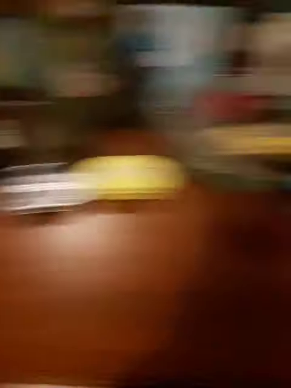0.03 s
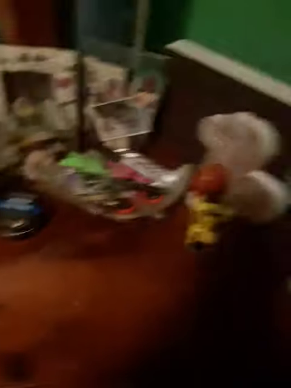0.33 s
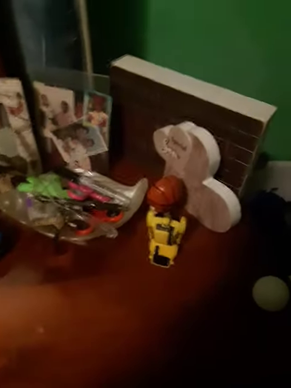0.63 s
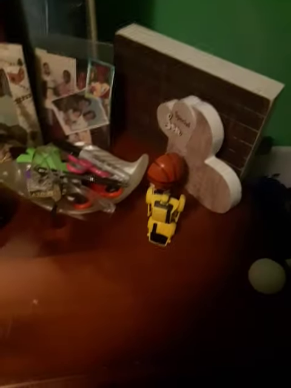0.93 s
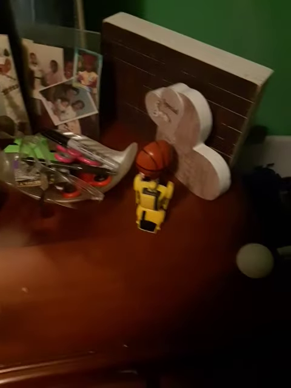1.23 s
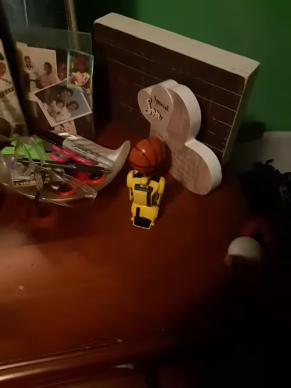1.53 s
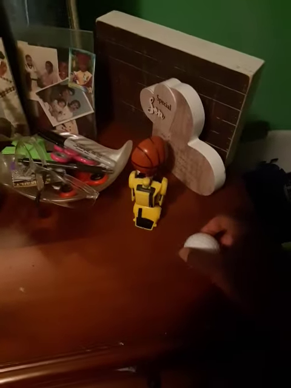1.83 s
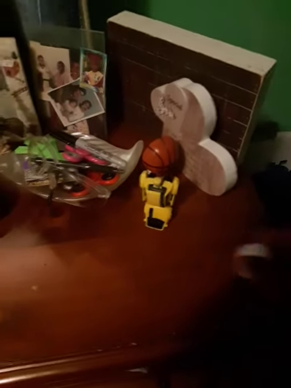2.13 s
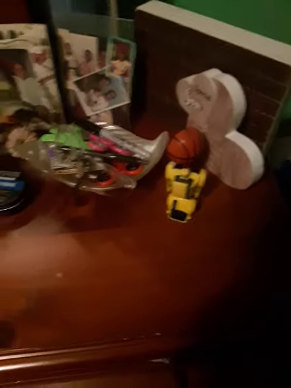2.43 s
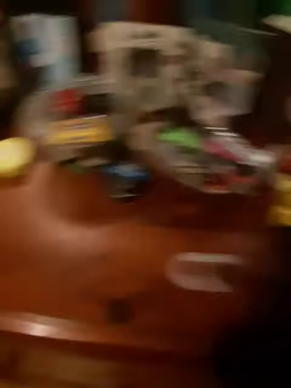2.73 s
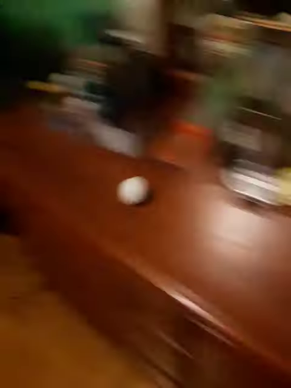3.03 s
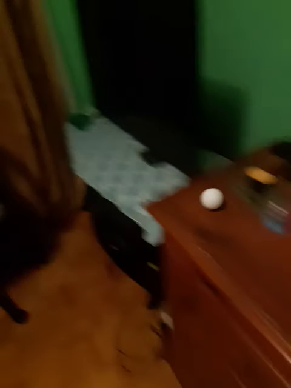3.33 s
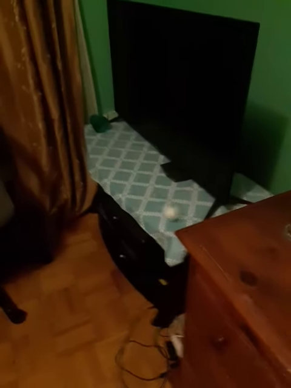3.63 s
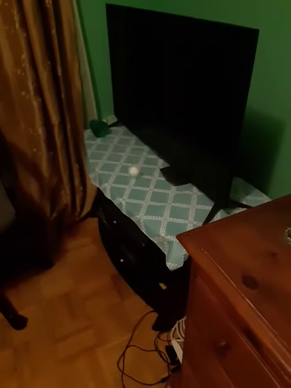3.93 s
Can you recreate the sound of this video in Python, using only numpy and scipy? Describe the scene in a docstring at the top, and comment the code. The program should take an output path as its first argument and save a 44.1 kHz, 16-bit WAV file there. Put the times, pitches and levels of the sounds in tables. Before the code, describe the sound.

A table-tennis ball bounces on a wooden dresser in a small, quiet room. At first there is only low rumble, a faint wavering hum and slight handling swishes, with a light finger tap at 1.5 seconds. From 2.8 to 3.4 seconds come about twelve sharp, hollow clicks, quickening and fading, slightly left, over low microphone bumps. From 3.7 to 4 seconds the ball knocks softly three times on a cloth-covered stand.

```python
"""Table-tennis ball on a dresser

A ball tossed on to a wooden dresser in a small, quiet bedroom bounces ever faster. Each impact excites
the modes of the top and of the hollow shell; the ball then drops off the end and knocks softly on a
cloth-covered stand. Before that come faint swishes and the tick of fingers picking up the ball.
Handling bumps, room rumble and a wavering low drone lie underneath."""
import sys
import numpy as np
from scipy import signal
from scipy.fft import rfft, irfft, next_fast_len
from scipy.io import wavfile
from scipy.ndimage import uniform_filter1d, map_coordinates

SR = 44100
rng = np.random.default_rng(int(sys.argv[2]) if len(sys.argv) > 2 else 0)


def unload_wav(signal):
    """Save mono or channel-first audio to the path in sys.argv[1] as 16-bit WAV at rate SR, clipped to [-1, 1]."""
    wavfile.write(
        sys.argv[1],
        SR,
        np.round(np.clip(np.atleast_2d(signal).T, -1, 1) * 32767).astype(np.int16),
    )


N = 176400
TIME = np.arange(N) / SR
AGE = np.arange(SR // 2) / SR  # time since a contact [s]

# left-right coherence of rumble and swishes: (frequency [Hz], correlation [-1..1])
NOISE_COHERENCE = [(30, 0.099), (60, 0.24), (130, 1), (300, 0.46), (1000, 0.091), (4000, 0.033),
                   (15000, .05)]


def dresser():
    """Modal excitation: each impact rings top and shell, and the spot struck sets which modes dominate."""
    # (time [s], contact time [s], knock [dB], centre of the favoured modes [Hz], their level [dB],
    #  thud [dB], crack [dB], click [dB], lower shell ring [dB], upper shell ring [dB])
    bounces = [(2.7924, 0.00075, -26, 1140, -30.5, -30.5, -36.5, -34, -37.5, -32.5),
               (2.897, 0.00056, -20.5, 1510, -26.5, -35.5, -22.5, -38, -24.5, -31),
               (2.9917, 0.00071, -24.5, 684, -22, -32.5, -30, -34.5, -36, -33.5),
               (3.0654, 0.00071, -27.5, 570, -27, -38.5, -39, -36, -43.5, -39.5),
               (3.1316, 0.000582, -24, 640, -28, -56, -33, -43.5, -41.5, -44),
               (3.1698, 0.00081, -30.5, 646, -31, -62, -45, -43, -44, -49),
               (3.2073, 0.00063, -28.5, 1530, -30.5, -70, -36, -47, -40, -43),
               (3.2435, 0.00071, -30, 905, -30.5, -61, -43, -42, -43, -41),
               (3.2919, 0.000831, -29, 680, -33.5, -57, -38.5, -39.5, -52, -41.5),
               (3.346, .000876, -30.5, 950, -31.5, -49.5, -41.5, -43, -47.5, -48.5),
               (3.392, 0.00077, -29.5, 1038, -30, -58.5, -42.5, -49, -53, -49),
               (3.4351, .00071, -35.5, 1030, -40, -53, -55, -55.5, -52.5, -58)]
    # spectra of wooden top, hard hit on varnish and contact click: (frequency [Hz], level [dB])
    wood_spectrum = [(60, -29), (120, -15), (200, -9.5), (360, -11), (470, -4), (660, -0.5), (800, -0.5),
                     (1100, -0.5), (1500, -4), (2100, -20), (2700, -18.5), (4400, -37.5), (16000, -70.5)]
    crack_spectrum = [(200, -33), (1000, -9), (1450, 3.5), (1750, 0.5), (2200, 0), (2650, -8.5), (3100, -8),
                      (3800, -10), (4500, -19.5), (9000, -41.5)]
    click_spectrum = [(60, -38.5), (300, -25), (2000, 6.5), (3400, 0.5), (4400, -1), (5400, 4), (8300, 5.5),
                      (10000, 2), (13000, -2), (16000, -5)]
    # the top's middle and lowest modes, the shell's two families: (frequency [Hz], level [dB], t60 [s])
    top_modes = [(449, -11.5, 0.038), (557.6, 0.5, 0.038), (612.5, 3.5, 0.036), (681, -2, 0.051),
                 (790, -7, 0.022), (888, -4.5, 0.049), (1122.5, -1, 0.05), (1347, -1, 0.034),
                 (1460, -2, 0.0076), (1566, -4, 0.03), (1767, 5, 0.02), (1995, -6, 0.029)]
    thud_modes = [(269.4, -2, 0.06), (313, -4, 0.034)]
    lower_modes = [(5294, -3.5, 0.0078), (5523, 5, 0.009), (5640, -4.5, .02), (6000, -1.5, 0.011),
                   (8880, -24, .008)]
    upper_modes = [(6060, 3.5, 0.0099), (6434, 5.5, 0.0091), (6610, -7, .028), (7000, 2.5, 0.0067),
                   (7780, -3.5, .007), (8245, 0, .008), (10480, -10.5, .01)]
    favour_octaves, board_rise_s = 0.2, 0.00091
    out = np.zeros((2, N))
    for s, contact_s, knock_db, board_hz, board_db, thud_db, crack_db, click_db, *shell_db in bounces:
        lower_db, upper_db = shell_db
        favoured = [(hz, db - (np.log2(hz / board_hz) / favour_octaves) ** 2, t60)
                    for hz, db, t60 in top_modes]
        knock = amp(knock_db) * burst(wood_spectrum, t60=0.023, rise_s=0.0014)
        board = amp(board_db) * ring(favoured, board_rise_s)
        thud = amp(thud_db) * ring(thud_modes, board_rise_s)
        click = amp(click_db) * burst(click_spectrum, t60=0.0022)
        shell = amp(lower_db) * ring(lower_modes) + amp(upper_db) * ring(upper_modes)
        crack = amp(crack_db) * burst(crack_spectrum, t60=0.0074)
        contact = touch_and_release(crack + click + shell, contact_s)
        add(out, s, in_room(knock + board + thud + contact, wet_db=0.5))
    return out


def touch_and_release(x, contact_s, release_db=-1.1):
    """Comb filtering: the shell clicks as it dents and as it springs back, giving a hollow pitch."""
    return filtered(x, lambda hz: 1 + amp(release_db) * np.exp(-2j * np.pi * hz * contact_s)) / np.sqrt(2)


def stand():
    """Cushioned impact: cloth dulls each landing to a knock and a tick; the panel beneath then booms."""
    # (time [s], knock [dB], boom [dB], cloth tick [dB], gap between the tick's two clicks [s])
    landings = [(3.6695, -34.5, -28, -45, 0), (3.863, -29.5, -42, -47.5, 0), (3.983, -41, -40, -58, .00021)]
    # spectra of the stand's knock and the cloth's tick: (frequency [Hz], level [dB])
    knock_spectrum = [(30, -57), (60, -42.5), (100, -19.5), (200, -3.5), (300, 8), (400, 2.5), (600, 3),
                      (1000, -1.5), (1500, -10), (2200, -39.5), (3200, -79), (8000, -40.5)]
    cloth_spectrum = [(60, -37), (500, 12), (2300, 12), (3500, -4), (5400, 1.5), (7500, -12.5), (11000, -6),
                      (13000, -12), (16000, -5)]
    # resonances of the panel: (frequency [Hz], level [dB], t60 [s])
    panel_modes = [(135.3, -7.5, 0.23), (162.3, -6, 0.11), (183.6, -7, 0.095), (297, -10, 0.063)]
    boom_delay_s = 0.0128
    out = np.zeros((2, N))
    for s, knock_db, boom_db, tick_db, gap_s in landings:
        tick = amp(tick_db) * touch_and_release(burst(cloth_spectrum, t60=0.18), gap_s)
        knock = amp(knock_db) * burst(knock_spectrum, t60=0.18, rise_s=0.01)
        add(out, s, in_room(knock + tick, wet_db=-3))
        add(out, s + boom_delay_s, amp(boom_db) * ring(panel_modes, rise_s=0.0098))
    return out


def pick_up():
    """Impulse response of a held shell: fingers tap the ball twice and it rings briefly."""
    # finger contacts: (time [s], tap [dB], shell ring [dB])
    taps = [(1.5455, -56, -63.5), (1.5765, -73, -69)]
    # spectrum of a finger tap: (frequency [Hz], level [dB])
    finger_spectrum = [(60, -23), (250, -37), (450, 0.5), (600, 9), (1150, 9.5), (1500, -13), (2200, -10.5),
                       (4500, -24.5), (8000, -11.5), (15000, -38)]
    # modes of the held shell: (frequency [Hz], level [dB], t60 [s])
    held_modes = [(5660, 6, 0.02), (5520, -6, .012), (5900, -6, .01), (8140, -18, 0.011)]
    out = np.zeros((2, N))
    for s, tap_db, ring_db in taps:
        tap = amp(tap_db) * burst(finger_spectrum, t60=0.028)
        shell = amp(ring_db) * ring(held_modes)
        add(out, s, in_room(tap + shell, wet_db=9.5))
    return out


def handling():
    """Structure-borne noise: low bumps, a tick and faint swishes as the microphone is swung about."""
    # handling bumps: (time [s], level [dB])
    bumps = [(0.613, -47), (2.619, -52.5), (2.982, -37.5), (3.03, -38.5), (3.138, -44)]
    # spectra of a bump and of the tick: (frequency [Hz], level [dB])
    bump_spectrum = [(20, -21.5), (50, -2.5), (90, 4.5), (160, -25.5), (500, -29), (2000, -63)]
    tick_spectrum = [(1500, -24), (2700, -3), (5200, 4), (7000, -14), (15000, -31)]
    # swells of rubbing noise: (time [s], half length [s], level [dB], centre [Hz], width [octaves])
    swishes = [(0.023, 0.045, -62.5, 920, 1), (0.094, 0.036, -68, 3100, 0.44),
               (0.075, 0.052, -69.5, 5100, 0.23), (0.065, 0.044, -74, 11500, 0.37),
               (0.382, 0.017, -77, 2500, 0.94), (0.454, 0.022, -73.5, 570, 0.67),
               (0.56, 0.075, -81, 2600, 0.9), (0.57, 0.022, -71, 270, 0.78)]
    tick_s, tick_db = 0.0885, -59.5
    out = np.zeros((2, N))
    for s, db in bumps:
        bump = np.array([burst(bump_spectrum, t60=0.1, rise_s=0.008) for channel in range(2)])
        add(out, s, amp(db) * bump)
    add(out, tick_s, amp(tick_db) * burst(tick_spectrum, t60=0.012))
    rub = stereo_noise(N, NOISE_COHERENCE)
    for s, half_s, db, centre_hz, octaves in swishes:
        hiss = filtered(rub, lambda hz: np.exp(-0.5 * (np.log2((hz + 1) / centre_hz) / octaves) ** 2))
        swell = np.exp(-0.5 * ((TIME - s) / half_s * 1.25) ** 2)
        out += amp(db) * unit(hiss) * swell
    return out


def in_room(x, wet_db):
    """Reverberation: direct sound, early reflections and a short diffuse tail, new for each spot."""
    # reverberation time: (frequency [Hz], t60 [s])
    decay_times = [(120, 0.14), (300, 0.3), (1000, 0.23), (3000, 0.19), (6000, 0.2), (10000, 0.16),
                   (15000, 0.23)]
    # colour of the tail: (frequency [Hz], relative level [dB])
    tail_spectrum = [(100, -2.5), (300, -2.5), (700, -6), (1500, -4.5), (3000, -2.5), (6000, -4.5),
                     (15000, -6)]
    # left-right coherence of reflected sound: (frequency [Hz], correlation [-1..1])
    coherence = [(130, .92), (300, 0.94), (600, 0.31), (1200, -0.18), (5000, -0.27)]
    # reflections from nearby surfaces: (delay [s], level [dB])
    echoes = [(.0079, -17.5), (0.0233, -25.5)]
    onset_s, clutter_db, clutter_t60 = 0.0079, -2.5, 0.024
    hz, t, bands = signal.stft(stereo_noise(len(AGE), coherence), SR, nperseg=256)
    decay = amp(-60 * t / along(decay_times, hz)[:, None])
    tail = signal.istft(bands * decay, SR, nperseg=256)[1][:, :len(AGE)]
    tail *= 1 - np.exp(-(AGE / onset_s) ** 2)
    tail = filtered(whitened(tail), lambda f: amp(wet_db + along(tail_spectrum, f)))
    # objects on the dresser scatter the sound
    scatter = stereo_noise(len(AGE), coherence) * amp(-60 * AGE / clutter_t60)
    early = amp(clutter_db) * scatter / np.linalg.norm(scatter[0])
    early[:, 0] += 1  # direct path
    for delay_s, db in echoes:
        path_s = delay_s * np.exp(0.087 * rng.standard_normal())
        for side in early:
            arrival_s = abs(path_s + 0.0001 * rng.standard_normal())
            side[int(arrival_s * SR)] += amp(db)
    return signal.fftconvolve(x[None], whitened(early) + tail, axes=1)


def drone():
    """Amplitude and frequency modulation: a low tone swells, flutters and wavers in pitch."""
    # slow swell: (time [s], relative level [dB])
    swell = [(0, -63), (.13, -62.5), (.22, -55.5), (.35, -59.5), (.43, -87), (.58, -68), (.78, -59.5),
             (1.0, -52), (1.27, -61.5), (1.83, -60), (2.05, -75), (2.25, -62.5), (2.552, -64), (2.8, -63.5)]
    pitch_hz, waver_hz, gain_db, flutter_db = 134.7, 1.73, -5, 1.5
    level_db = np.interp(TIME, *np.transpose(swell)) + gain_db + flutter_db * wobble(per_s=19)
    hz = pitch_hz + waver_hz * wobble(per_s=21)
    return amp(level_db) * unit(np.sin(2 * np.pi * np.cumsum(hz) / SR))


def room_noise(level_db=-67):
    """Stationary broadband noise: the room's low rumble and faint hiss."""
    # noise floor: (frequency [Hz], relative spectral density [dB])
    spectrum = [(25, -23), (45, -15), (60, -2), (90, -11), (130, -9), (175, -10), (240, -11), (330, -21),
                (500, -25.5), (1000, -31.5), (3000, -36.5), (15800, -37.5)]
    noise = stereo_noise(N, NOISE_COHERENCE)
    return amp(level_db) * unit(filtered(noise, lambda hz: amp(along(spectrum, hz))))


def burst(spectrum, t60, rise_s=0.0001):
    """Modal overlap: a struck body's crowded modes merge into decaying noise of the body's colour."""
    shake = rng.standard_normal(len(AGE)) * amp(-60 * AGE / t60) * (1 - np.exp(-AGE / rise_s))
    gain = amp(along(spectrum, np.fft.rfftfreq(len(AGE), 1 / SR)))
    return unit_energy(coloured(whitened(shake), gain))


def ring(modes, rise_s=0.00053, scatter_db=1.85):
    """Free vibration: damped sines whose strengths and phases vary from contact to contact."""
    x = np.zeros(len(AGE))
    for hz, db, t60 in modes:
        envelope = amp(db + scatter_db * rng.standard_normal() - 60 * AGE / t60)
        x += envelope * np.sin(2 * np.pi * (hz * AGE + rng.random()))
    return unit_energy(x * (1 - np.exp(-AGE / rise_s)))


def stereo_noise(size, coherence):
    """Partial coherence: the balance of mid and side noise sets the left-right correlation."""
    def balance(hz):
        angle = np.arccos(np.clip(along(coherence, hz), -1, 1)) / 2
        return np.array([np.cos(angle), np.sin(angle)])
    mid, side = filtered(rng.standard_normal((2, size)), balance)
    return np.array([mid + side, mid - side])


def coloured(x, gain):
    """Minimum-phase filtering: folding the cepstrum makes a gain per frequency bin causal."""
    n = x.shape[-1]
    cepstrum = irfft(np.log(gain), n)
    cepstrum[1:n // 2] *= 2
    cepstrum[n // 2 + 1:] = 0
    return irfft(rfft(x) * np.exp(rfft(cepstrum)), n)


def whitened(x):
    """Whitening: the broad spectrum is flattened while its fine grain remains."""
    power = np.mean(np.abs(rfft(np.atleast_2d(x))) ** 2, axis=0)
    broad_power = np.abs(uniform_filter1d(power, size=160)) + 1e-12
    return coloured(x, broad_power ** -0.5)


def filtered(x, response):
    """Linear filtering: the spectrum of x times a response of frequency."""
    n = x.shape[-1]
    padded = next_fast_len(n + SR // 10)
    return irfft(rfft(x, padded) * response(np.fft.rfftfreq(padded, 1 / SR)), padded)[..., :n]


def amp(db):
    """Decibels to amplitude ratio."""
    return 10 ** (np.asarray(db) / 20)


def unit(x):
    """Normalisation to rms 1."""
    return x / np.sqrt(np.mean(x ** 2) + 1e-20)


def unit_energy(x):
    """Normalisation to the energy of 5 ms at rms 1."""
    return x / np.sqrt(np.sum(x ** 2) / (0.005 * SR) + 1e-20)


def along(points, hz):
    """Interpolation of (frequency [Hz], value) points on a logarithmic frequency axis."""
    knots_hz, values = np.transpose(points)
    return np.interp(np.log(hz + 1), np.log(knots_hz + 1), values)


def wobble(per_s):
    """Random modulation: a smooth curve through per_s random knots a second."""
    knots = rng.standard_normal(int(N * per_s / SR) + 4)
    return map_coordinates(knots, [TIME * per_s])


def add(track, s, x):
    """Superposition: x joins the track from time s."""
    part = track[:, round(s * SR):][:, :x.shape[-1]]
    part += x[..., :part.shape[1]]


def scene():
    """Level and time differences place the ball to the left; handling, rumble and drone lie under it."""
    # level difference, greatest in the treble: (frequency [Hz], left minus right [dB])
    left_excess = [(100, 1.5), (300, 3), (1000, 0.5), (2200, 3), (5000, 4), (15000, 6)]
    right_lag_s, sides = 0.00004, np.array([[0.5], [-0.5]])

    def direction(hz):
        return amp(sides * along(left_excess, hz)) * np.exp(2j * np.pi * hz * sides * right_lag_s)
    ball = filtered(dresser() + stand() + pick_up(), direction)
    return ball + handling() + room_noise() + drone()


def record(dry):
    """Band limiting: a steep low-pass removes the highest treble."""
    cutoff_hz = 16000
    return filtered(dry, lambda hz: 1 / np.sqrt(1 + (hz / cutoff_hz) ** 160))


dry = scene()
out = record(dry)
unload_wav(out)
```